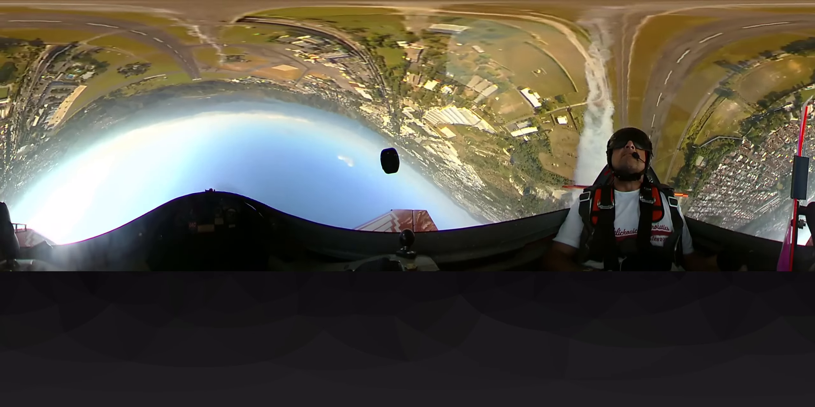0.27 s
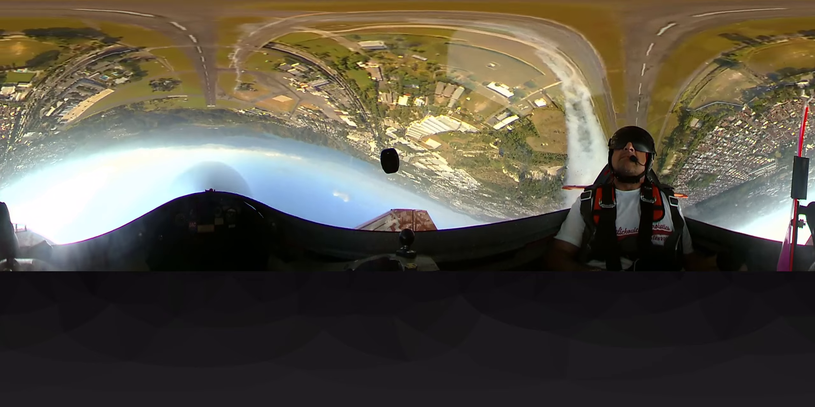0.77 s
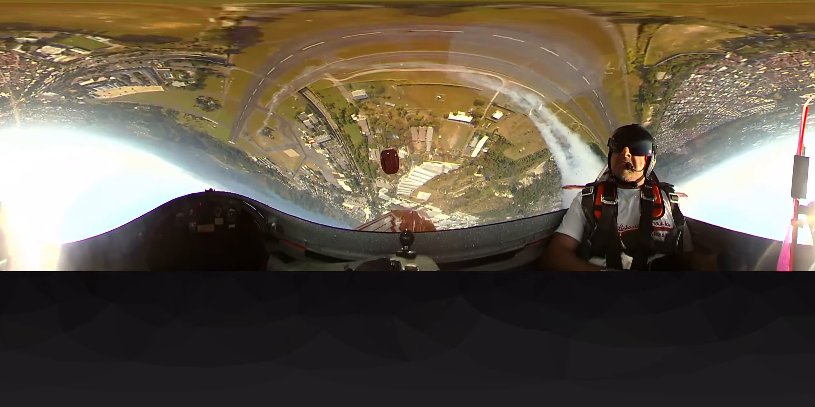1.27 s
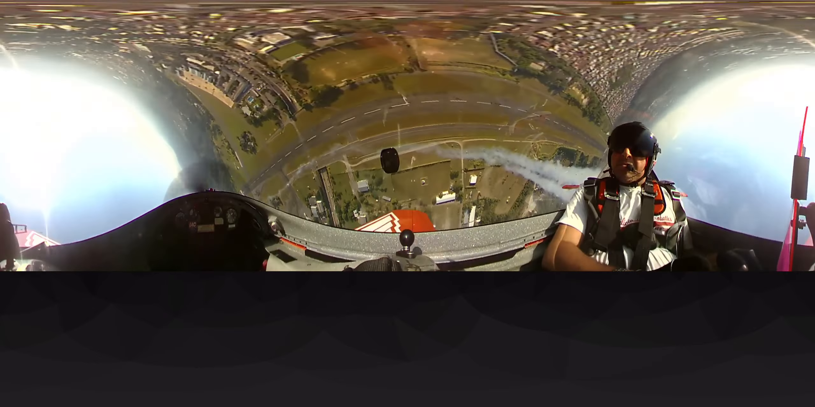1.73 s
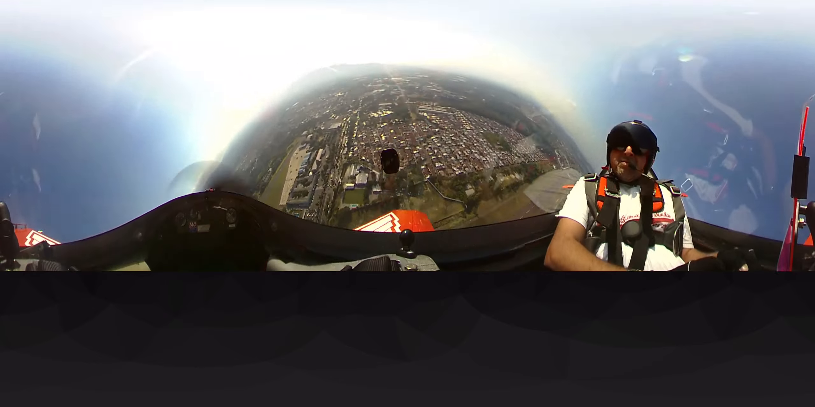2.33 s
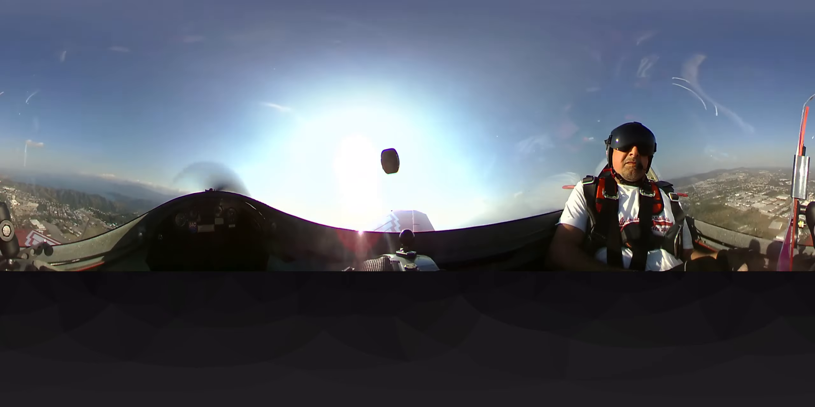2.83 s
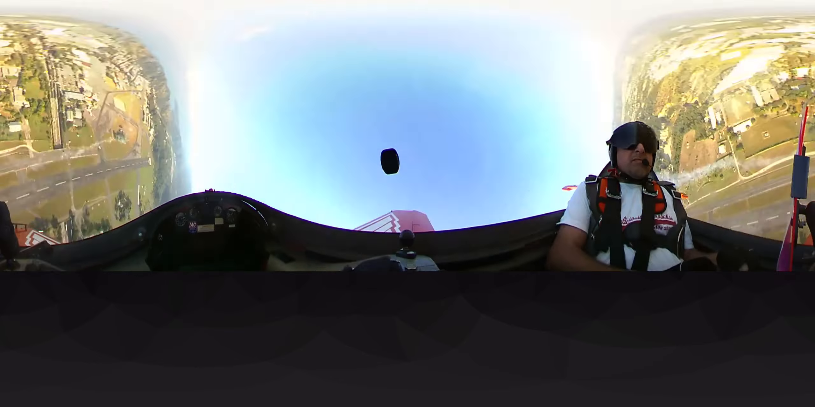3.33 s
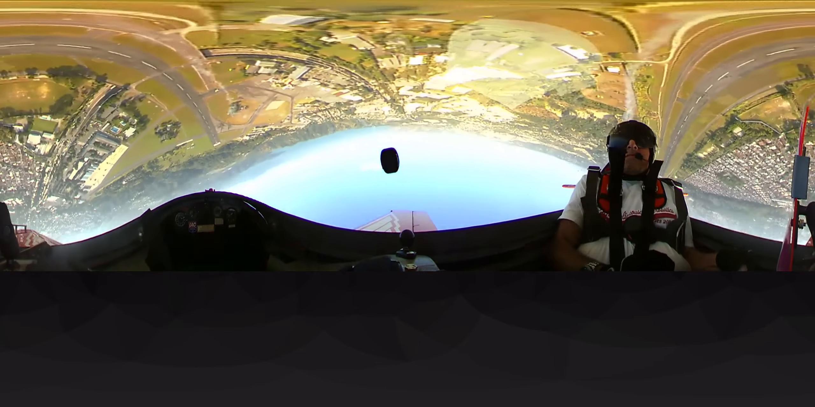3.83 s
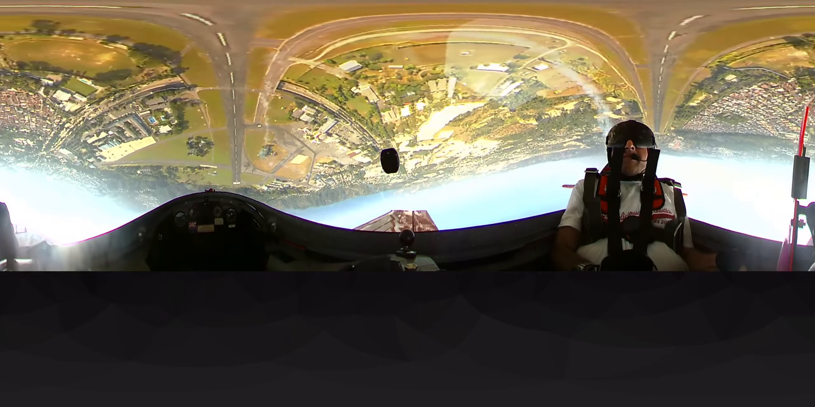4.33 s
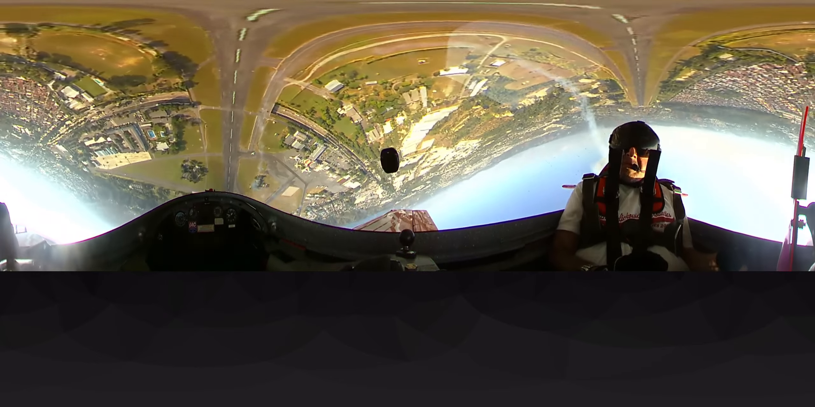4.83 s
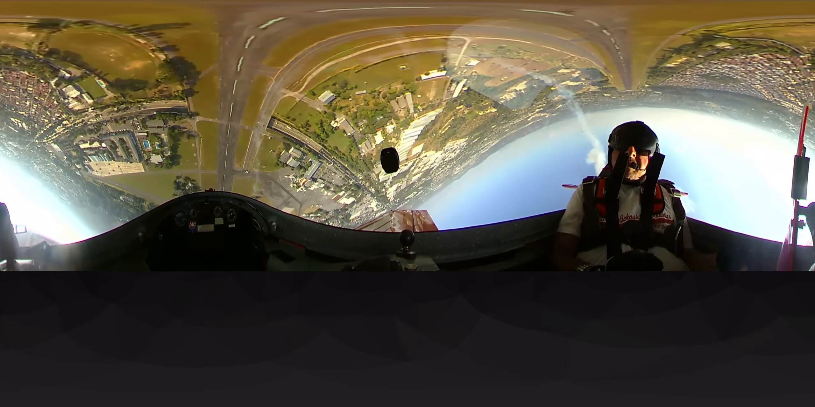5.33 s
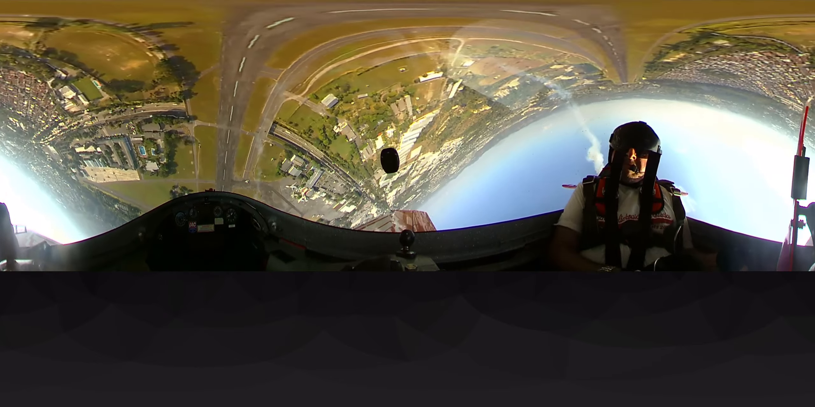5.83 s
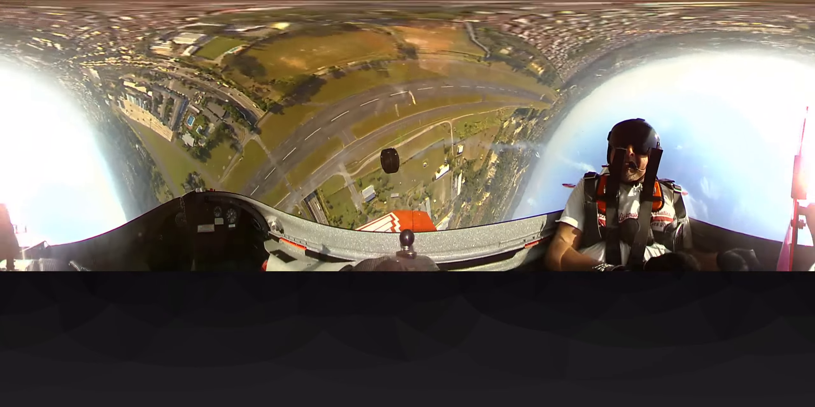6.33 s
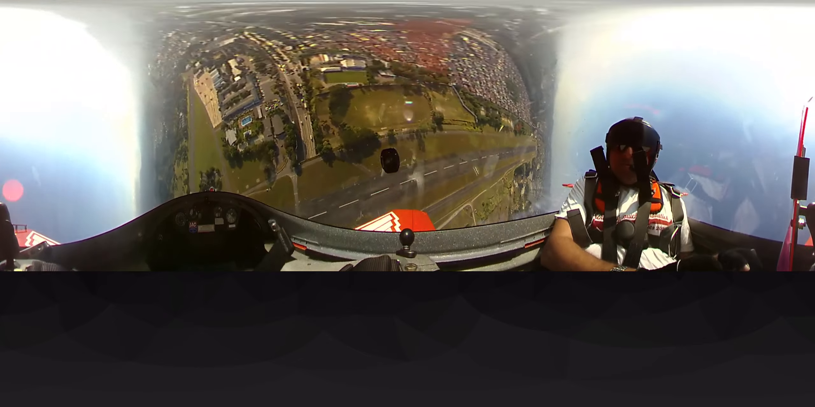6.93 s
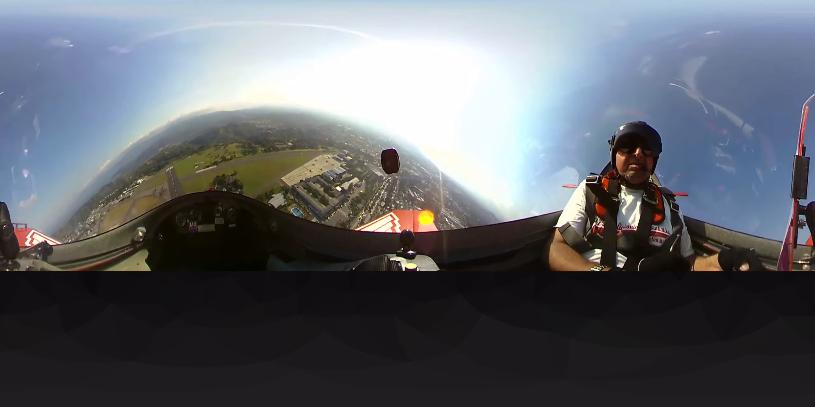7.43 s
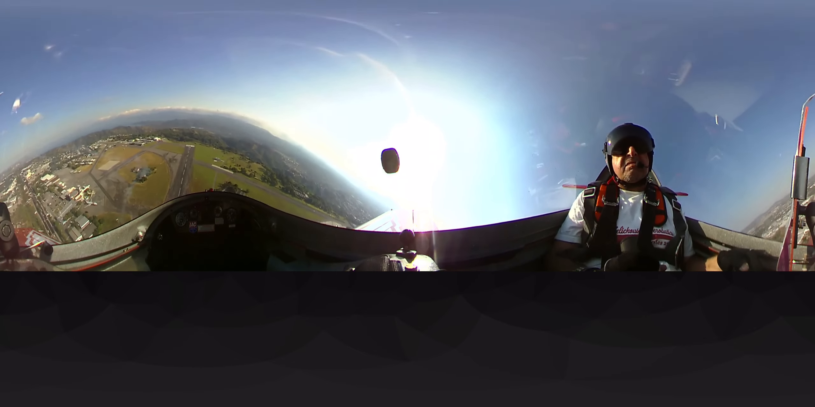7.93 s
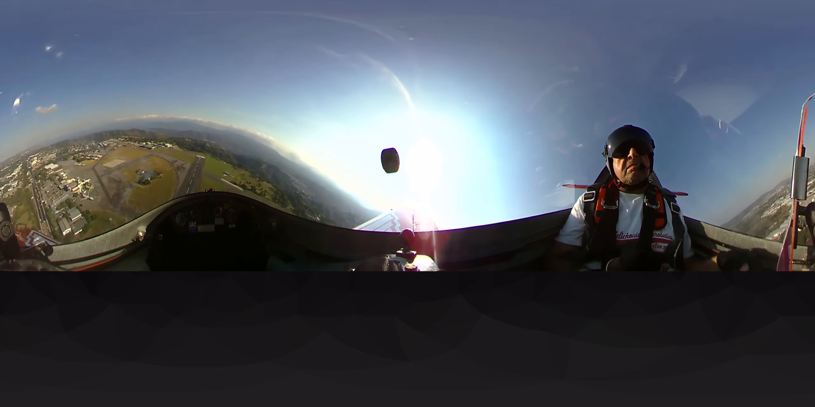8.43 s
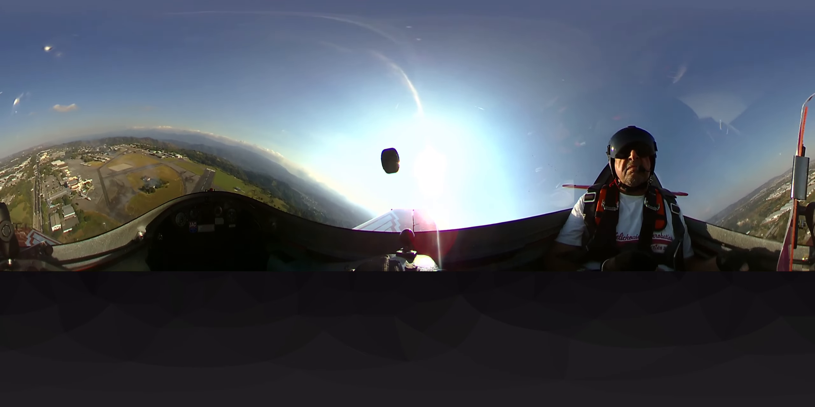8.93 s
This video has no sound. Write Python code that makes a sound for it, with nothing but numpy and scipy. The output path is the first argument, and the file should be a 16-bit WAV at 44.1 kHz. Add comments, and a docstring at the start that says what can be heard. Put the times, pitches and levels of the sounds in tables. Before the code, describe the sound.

From 0 s the sound is already at full power: a six-cylinder piston engine and propeller droning inside a small cockpit, close and loud. A strong low boom near 270 Hz leads, with deeper propeller hum and a rough, fast, slightly uneven exhaust beat. The lowest airframe throb swells in over the first half second, drops out briefly around 3.1 s, and later comes and goes. Pitch creeps up until about 2.5 s, sags by 3.3-3.7 s, recovers near 4.2 s, then wavers by tiny amounts, dipping again around 8.5 s. Panels buzz harder from about 2 s; the boom shifts colour near 3.8 and 6.2 s. Rasp, clatter and faint ticks persist. Wind roar and thin hiss ease at about 1 s, then build from 6 s, strongest after 8 s. Level stays compressed and even, and the drone is still running at the end, about 9.2 s.

```python
"""Aerobatic cockpit at full power

Inside the cockpit of a rolling aerobatic plane, with the microphone close to every source.
A six-cylinder piston engine and its propeller drone at a governed speed that sags and recovers with the
manoeuvres: tones locked to the crankshaft angle. Exhaust beats rasp in the panels as shaped noise bursts,
fittings tick, and filtered noise makes the slipstream roar and hiss round the canopy as airspeed builds.
The recorder's fast gain control evens out the level.
"""
import sys
import numpy as np
from scipy import signal
from scipy.fft import rfft, irfft, next_fast_len
from scipy.io import wavfile
from scipy.ndimage import uniform_filter1d, map_coordinates

SR = 44100
rng = np.random.default_rng(int(sys.argv[2]) if len(sys.argv) > 2 else 0)


def materialize(psi):
    """Save the field psi as 16-bit PCM at rate SR to the path in sys.argv[1].

    A 1-D psi becomes a single channel; in a 2-D psi each row is a channel.
    """
    bounded = np.clip(np.atleast_2d(psi).T, -1, 1)
    quanta = np.round(bounded * 32767).astype(np.int16)
    wavfile.write(sys.argv[1], SR, quanta)


N = 405274
TIME = np.arange(N) / SR  # seconds

# All levels are those ahead of the recorder's gain control.
# crankshaft speed: time_s, speed_turns_per_s
SHAFT_SPEED = [(0, 44.75), (.6, 44.76), (1.7, 45.08), (2.5, 45.67), (3.25, 44.9), (3.65, 44.83),
               (4.15, 45.65), (5.2, 45.48), (6.15, 45.89), (6.6, 45.35), (7.1, 46.03), (7.5, 45.48),
               (8, 45.92), (8.5, 44.99), (8.85, 45.42), (9.19, 45.55)]
# the airframe's once-a-turn throb: time_s, level_db
THROB_LEVEL = [(0, -45), (.17, -38), (.35, -22), (.6, -18), (1.3, -19), (3.07, -22.5), (3.15, -48),
               (3.25, -19.5), (3.65, -22.5), (4.35, -28.5), (5.03, -26), (5.15, -20.5), (6.5, -22.5),
               (7.25, -29), (7.55, -23.5), (7.85, -33), (8.65, -26), (9.19, -28.5)]
# strong engine and propeller tones: shaft_order, level_db, then slopes:
# speed_db_per_turn_per_s (over the governed speed), airflow_db_per_db, load_db_per_db, tip_db_per_db
STRONG_TONES = [(2, -38.5, -1, -0.65, -0.3, -0.11), (3, -34.5, -8.5, -1.75, 0.6, 0.18),
                (4, -30.5, 0.3, 0, 0.2, -.15), (6, -20.5, -1, -0.09, 0.22, -.65),
                (8, -29, -1, 0.13, .65, 0.65), (10, -41.5, 0, 1.56, .2, -0.17)]
# weaker tones, half orders coming from unequal cylinders: shaft_order, level_db
WEAK_TONES = [(1.5,-45), (2.5,-47), (3.5,-43), (4.5,-47), (5,-39), (7,-40), (8.5,-44), (9,-43), (10.5,-49),
              (11,-55), (11.5,-52), (12,-47), (13,-56), (14,-52), (14.5,-59), (15,-52), (16,-63)]
# buzz of the panels at 0 dB load: shaft_order, level_db
PANEL_BUZZ = [(18.5,-60), (20,-65), (20.5,-60), (22.5,-65), (28,-62), (28.5,-58), (29.5,-60), (30.5,-53),
              (31,-61), (32,-61), (34.5,-67), (45,-71)]
# engine load, which sets how hard the panels are driven: time_s, load_db
ENGINE_LOAD = [(0, -10), (1.2, -11), (2.2, -1), (3.5, -3), (4.6, 0.5), (6.9, -1.5), (7.8, -4.5),
               (9.19, -2.5)]
# strength of the airflow round the cockpit, growing with airspeed: time_s, airflow_db
AIRFLOW_STRENGTH = [(0, 0), (.23, 0.5), (.4, -3.5), (1, -5), (1.7, -1.5), (3.2, -1.3), (3.8, -2.2),
                    (4.7, 1), (5.3, -1), (6.7, 3), (7.3, 3.5), (7.65, 0.7), (8, 4), (8.6, 5.5), (9.19, 5)]
# the cabin's boom tips from the sixth shaft order towards the eighth: time_s, tip_db
BOOM_TIP = [(0, 0.5), (3.2, -1.5), (3.8, 5.5), (4.3, -3.5), (5.2, 1.5), (5.8, -3), (6.15, 6.5), (6.6, -1.5),
            (9.19, -3.5)]
# the cylinders in firing order: relative_strength_db
CYLINDER_STRENGTHS = [-0.5, -4.5, -5.5, -1, -3, -7]
# spectral shapes of exhaust and engine noise: frequency_hz, relative_level_db
BARK_SPECTRUM = [(300, -27.5), (500, -3.5), (580, -5.5), (670, 0.5), (780, -3), (920, -8), (1100, -12.5),
                 (1400, -22.5), (2500, -52.5)]
RASP_SPECTRUM = [(700, -36.5), (1000, -17.5), (1130, -15.5), (1290, -1.5), (1345, -2.5), (1400, -0.5),
                 (1500, -8), (1650, -9.5), (1760, -25), (1900, -28), (3000, -56)]
CLATTER_SPECTRUM = [(1400, -18), (1850, -7.5), (2020, -2), (2160, 2.5), (2420, 1.5), (2620, -7),
                    (2780, -7.5), (3150, -10), (3550, -19), (3950, -15), (4180, -9.5), (4500, -23),
                    (9000, -34.5), (14000, -46.5)]
# spectral shapes of the air noise: frequency_hz, relative_level_db
BUFFET_SPECTRUM = [(8, -10.5), (20, -1.5), (32, 3.5), (56, -1.5), (80, -0.5), (125, 0), (170, -14.5),
                   (300, -56)]
ROAR_SPECTRUM = [(70, -42.5), (130, -14.5), (170, -4), (195, -10), (238, 3.5), (275, -4.5), (315, -11.5),
                 (355, -5.5), (425, -13), (570, -19.5), (700, -26.5), (850, -40), (1000, -45),
                 (2000, -69.5)]
HISS_SPECTRUM = [(2000, -10.5), (3500, -5.5), (4900, -2), (5800, 1), (7700, 2.5), (8700, 1), (9400, -4.5),
                 (10200, -20), (14000, -18)]
# noisy layers by name: level_db, airflow_db_per_db, load_db_per_db, throb_db_per_db, drift_db
LAYER_LEVELS = {"buffet": (-36, 0.6, -.1, 0, 0.5), "roar": (-29, 0.92, -0.17, -0.01, 0.6),
                "bark": (-49, 0.43, 0.07, 0.02, 0), "rasp": (-48, .17, 0, 0.04, 0),
                "clatter": (-58, 0.27, 0.12, 0.06, -0.04), "hiss": (-65, 0.9, -0.12, 0, 0.2)}
# spectral shape of a loose fitting's tick: frequency_hz, relative_level_db
TICK_SPECTRUM = [(800, -17.5), (2900, -1.5), (5000, -10.5), (9000, -10.5), (14000, -22)]

GOVERNED_HZ = 45.4  # shaft turns per second
BOOM_ORDER = 6  # shaft order that booms in the cabin
TONE_WANDER_DB, BOOM_WANDER_DB = 1.84, .5  # slow chance drift; the boom is steadier
USUAL_THROB_DB = -24  # noisy layers follow the throb's departure from this
THROB_LEAD_TURNS = .1  # the throb runs this far ahead of the shaft angle
THROB_SHAKE, THROB_SHAKE_GROWS = 0.22, 1.3  # share that flutters; dB it grows per dB of airflow
# Unequal cylinders: every two turns the shaft runs ahead and behind, the beat swells and sinks.
LOPE_TURNS, LOPE_SWELL = 0.0085, 0.087  # turns; share of amplitude
TOP_HZ = 14250  # upper band limit


def amp(db):
    """Decibels to gain."""
    return 10 ** (np.asarray(db) / 20)


def unit(x):
    """Scale to rms 1."""
    return x / np.sqrt(np.mean(x ** 2) + 1e-20)


def curves(rows):
    """One value per sample for each column after the time."""
    time_s, *columns = np.transpose(rows)
    return [np.interp(TIME, time_s, column) for column in columns]


def wobble(rate):
    """A smooth random curve, rate knots a second."""
    knots = rng.standard_normal(int(N * rate / SR) + 4)
    coarse_s = TIME[::64]
    spline = map_coordinates(knots, [coarse_s * rate])
    return np.interp(TIME, coarse_s, spline)


def noise():
    """Fresh white noise."""
    return rng.standard_normal(N)


def colour(x, spectrum):
    """Pass x through a causal minimum-phase body with the given response; rms 1."""
    size = 2 * next_fast_len(N // 2 + 8192)
    hz, db = np.transpose(spectrum)
    bins_hz = np.fft.rfftfreq(size, 1 / SR)
    gain = amp(np.interp(np.log(bins_hz + 1), np.log(hz), db))
    # folding the cepstrum forward in time makes the response causal
    cepstrum = irfft(np.log(gain))
    cepstrum[1:size // 2] *= 2
    cepstrum[size // 2 + 1:] = 0
    response = np.exp(rfft(cepstrum))
    return unit(irfft(rfft(x, size) * response)[:N])


def level(layer):
    """Gain of a noisy layer: it follows airflow, load and throb by its own slopes, and may drift a little."""
    db, by_airflow, by_load, by_throb, drift_db = LAYER_LEVELS[layer]
    follows_db = by_airflow * curves(AIRFLOW_STRENGTH)[0]
    follows_db += by_load * curves(ENGINE_LOAD)[0]
    follows_db += by_throb * (curves(THROB_LEVEL)[0] - USUAL_THROB_DB)
    return amp(db + follows_db + drift_db * wobble(3))


def tone(turns, order, flutter_db, drift, smear):
    """One shaft order of the pressure beat; cabin reflections smear its phase (radians) and it wavers."""
    # tones between the first and fourth orders lie below the cabin's resonances and lead a quarter cycle
    lead = np.pi / 2 * (1 < order < 4)
    phase = 2 * np.pi * order * turns + lead
    phase += smear * rng.standard_normal() + drift * wobble(7.6)
    return unit(np.cos(phase) * amp(flutter_db * wobble(9)))


def throb(turns):
    """The airframe throbs once a turn; stronger airflow shakes the throb more."""
    shake = THROB_SHAKE * amp(THROB_SHAKE_GROWS * curves(AIRFLOW_STRENGTH)[0]) * wobble(13)
    beat = tone(turns + THROB_LEAD_TURNS, order=1, flutter_db=.5, drift=.08, smear=.1)
    return amp(curves(THROB_LEVEL)[0]) * (1 + shake) * beat


def strong_tones(turns):
    """Tones follow shaft speed, airflow and load; the boom tips between two of them and all lope."""
    overspeed = curves(SHAFT_SPEED)[0] - GOVERNED_HZ
    controls = np.array([overspeed, *curves(AIRFLOW_STRENGTH), *curves(ENGINE_LOAD), *curves(BOOM_TIP)])
    loping = turns + LOPE_TURNS * np.sin(np.pi * turns)
    total = np.zeros(N)
    for order, db, *slopes in STRONG_TONES:
        order = round(order)
        wander_db = BOOM_WANDER_DB if order == BOOM_ORDER else TONE_WANDER_DB
        gain = amp(db + np.dot(slopes, controls) + wander_db * wobble(3))
        total += gain * tone(loping, order, flutter_db=.3, drift=.04, smear=.12)
    return total * (1 - LOPE_SWELL * np.cos(np.pi * turns))


def weak_tones(turns):
    """Unequal cylinders fill in weaker whole and half shaft orders, widely smeared in phase."""
    total = np.zeros(N)
    for order, db in WEAK_TONES:
        gain = amp(db + 0.91 * wobble(1.2))
        total += gain * tone(turns, order, flutter_db=1.07, drift=0.17, smear=1.87)
    return total


def panel_buzz(turns):
    """Panels buzz at high shaft orders, driven harder as engine load rises."""
    total = np.zeros(N)
    for order, db in PANEL_BUZZ:
        gain = amp(db + 0.69 * wobble(1.0))
        total += gain * tone(turns, order, flutter_db=2.5, drift=0.4, smear=1.1)
    return amp(curves(ENGINE_LOAD)[0]) * total


def drone(turns):
    """Strong tones from the fourth order up nearly crest together as sharp beats; orders two and three lead."""
    return throb(turns) + strong_tones(turns) + weak_tones(turns) + panel_buzz(turns)


def firings(turns, decay, uneven, scatter_db):
    """Envelope of the exhaust, three beats a turn; decay is in beats, uneven scales cylinder strengths."""
    beat, since = np.divmod(3 * turns, 1)
    beat = beat.astype(int)
    count = beat[-1] + 1
    size_db = uneven * np.resize(CYLINDER_STRENGTHS, count) + scatter_db * rng.standard_normal(count)
    return amp(size_db[beat]) * np.exp(-since / decay)


def bursts(turns, repeat_db, decay, uneven, scatter_db):
    """A burst for each firing: part repeats every two turns, part is fresh turbulence."""
    cycle = rng.standard_normal(1024)
    repeating = np.interp(turns / 2 % 1, np.linspace(0, 1, len(cycle)), cycle)
    turbulence = amp(repeat_db) * unit(repeating) + noise()
    return turbulence * firings(turns, decay, uneven, scatter_db)


def exhaust(turns):
    """Each firing barks from the pipes, rasps in the panels near 1.4 kHz and makes the engine clatter."""
    bark = bursts(turns, repeat_db=-3.5, decay=.45, uneven=1.9, scatter_db=1.1)
    rasp = bursts(turns, repeat_db=-4.5, decay=0.97, uneven=0.82, scatter_db=1.7)
    clatter = bursts(turns, repeat_db=-2, decay=2.2, uneven=.5, scatter_db=1.0)
    total = level("bark") * colour(bark, BARK_SPECTRUM)
    total += level("rasp") * colour(rasp, RASP_SPECTRUM)
    total += level("clatter") * colour(clatter, CLATTER_SPECTRUM)
    surge = amp(0.2 * wobble(10) + 1.1 * wobble(90))  # uneven combustion sways all three together
    return surge * total


def ticks(turns):
    """Loose fittings tick once a turn, now lightly, now harder, as short decaying noise."""
    turn, since = np.divmod(turns, 1)
    sizes = amp(10 * rng.random(int(turn[-1]) + 1))  # spread over 10 dB
    envelope = sizes[turn.astype(int)] * np.exp(-since / 0.063)  # decay in turns
    return amp(-70.5) * colour(noise() * envelope, TICK_SPECTRUM)


def slipstream(turns):
    """Air buffets the fuselage, roars in the cabin and hisses through the canopy seal, propeller-chopped."""
    blades = np.cos(4 * np.pi * turns)  # two blades pass each turn
    buffet = level("buffet") * colour(noise(), BUFFET_SPECTRUM)
    chopped_air = noise() * amp(2.6 * blades)
    roar = level("roar") * amp(0.21 * wobble(10)) * colour(chopped_air, ROAR_SPECTRUM)
    # the hiss also swells every two turns and flickers at random
    chop_db = 0.78 * np.cos(np.pi * turns) + .7 * blades + .4 * wobble(9.5) + 1.8 * wobble(70)
    hiss = level("hiss") * unit(amp(chop_db) * colour(noise(), HISS_SPECTRUM))
    return buffet + roar + hiss


def scene():
    """Engine, propeller and chopped air all follow the angle of the crankshaft."""
    turns = np.cumsum(curves(SHAFT_SPEED)[0]) / SR
    return (drone(turns) + exhaust(turns) + ticks(turns) + slipstream(turns))[None]


def record(dry):
    """Fast gain control steadies the level; a steep low-pass sets the band limit."""
    power = np.abs(uniform_filter1d(dry ** 2, size=2900, axis=-1)) + 1e-9  # 66 ms window
    held = dry * (amp(-17.6) / np.sqrt(power)) ** .8  # takes out 80 % of the level change in dB
    soft_start = np.minimum(TIME / .003, 1)
    band_limit = signal.ellip(12, .1, 90, TOP_HZ, fs=SR, output="sos")
    return signal.sosfilt(band_limit, held * soft_start)


dry = scene()
out = record(dry)
materialize(out)
```